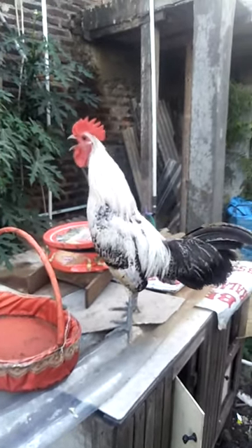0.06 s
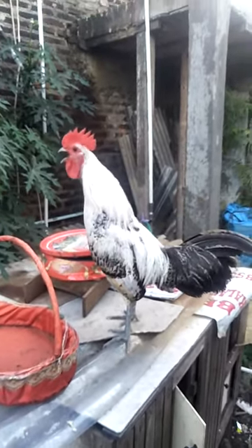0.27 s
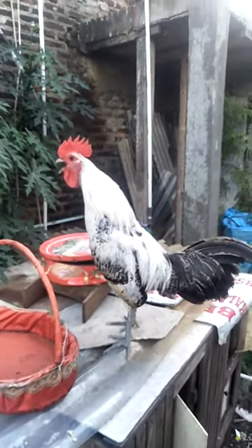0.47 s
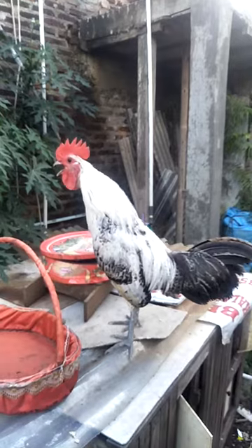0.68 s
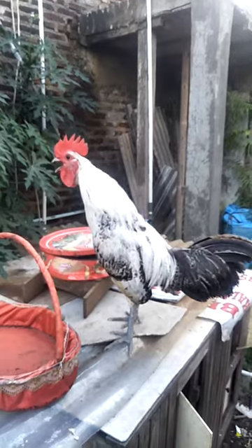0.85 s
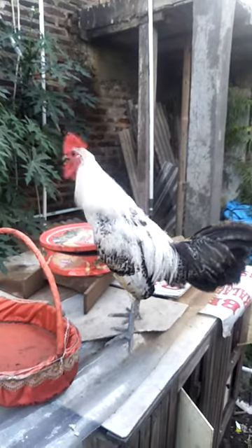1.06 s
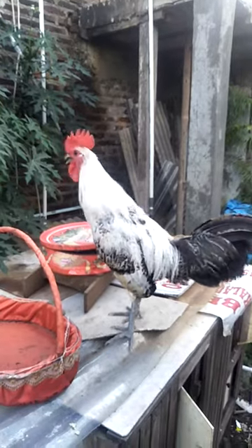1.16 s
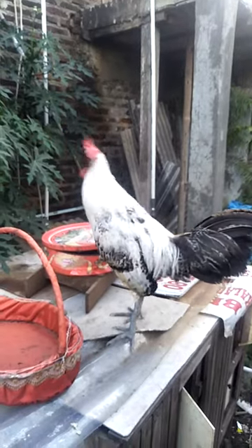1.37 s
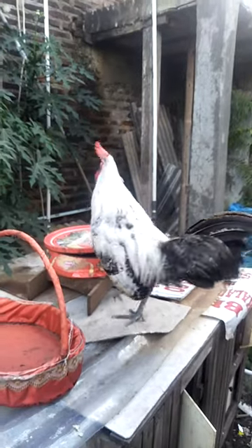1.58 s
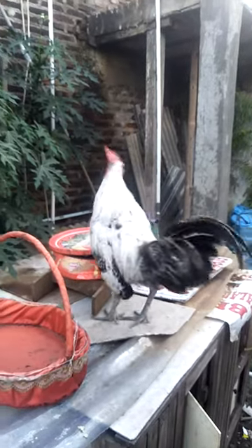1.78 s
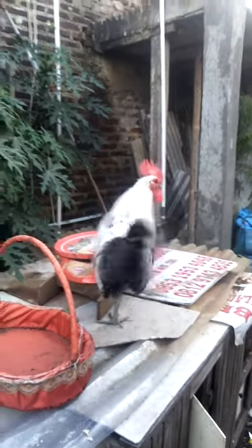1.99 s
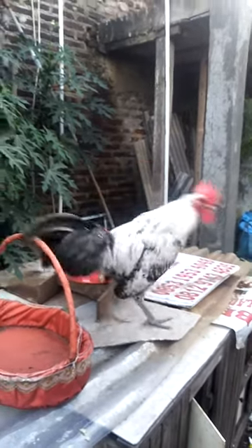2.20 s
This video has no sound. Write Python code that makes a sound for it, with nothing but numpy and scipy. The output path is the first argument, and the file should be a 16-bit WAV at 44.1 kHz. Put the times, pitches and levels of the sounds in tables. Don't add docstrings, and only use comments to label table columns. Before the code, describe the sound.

A rooster close to the microphone gives one loud crow, a hoarse shriek into a long sagging note and soft low drawl, then claws scuff and knock on boards over faint town rumble in a walled yard.

```python
import sys
import numpy as np
from scipy import signal
from scipy.fft import rfft, irfft
from scipy.io import wavfile
from scipy.ndimage import uniform_filter1d

SR = 44100
rng = np.random.default_rng(int(sys.argv[2]) if len(sys.argv) > 2 else 0)


def to_wav(s):
    ch = np.atleast_2d(s).T
    pcm = np.round(np.clip(ch, -1, 1) * 32767)
    wavfile.write(sys.argv[1], SR, pcm.astype(np.int16))


def amplitude_ratio(level_db):
    exponent = np.asarray(level_db, float) / 20
    return 10 ** exponent


N = 99225
LEAD = 13230
M = N + LEAD


def evened(x):
    return x / np.sqrt(np.mean(x ** 2) + 1e-20)


def read(points, hz):
    f, value = np.transpose(points)
    return np.interp(np.log(hz + 1), np.log(f + 1), value)


def colour(x, points):
    gain = amplitude_ratio(read(points, np.fft.rfftfreq(len(x), 1 / SR)))
    return irfft(rfft(x) * gain, len(x))


def drift(n, top_hz):
    low_pass = signal.butter(2, top_hz, fs=SR, output="sos")
    settle = 9000
    return evened(signal.sosfilt(low_pass, rng.standard_normal(n + settle))[settle:])


def fuzz(n, hz, width_hz):
    angle = 2 * np.pi * hz * np.arange(n) / SR
    return evened(drift(n, width_hz / 2) * np.cos(angle) + drift(n, width_hz / 2) * np.sin(angle))


def add(mix, s, sound):
    part = mix[LEAD + round(s * SR):][:len(sound)]
    part += sound[:len(part)]


# lock to every nth cycle, level in dB.
FOLD_SLIPS = [(5, 0), (3, -2), (2, -6)]


def fold_shake(hz):
    n, wander, breath_db = len(hz), .032, -11
    slips = 0
    for every, db in FOLD_SLIPS:
        slow = np.cumsum(hz / every * (1 + wander * drift(n, 19.8))) / SR
        swing = np.cos(2 * np.pi * slow) + .5 * np.cos(4 * np.pi * slow + 1)
        slips = slips + amplitude_ratio(db + 5.0 * drift(n, 8)) * swing
    return evened(evened(slips) + amplitude_ratio(breath_db) * drift(n, 600))


# frequency in Hz, level in dB.
THROAT = [(150, -63), (560, -37), (800, -10.5), (1010, -19), (1270, -11), (1450, -18), (1830, -6),
          (2400, -3.5),
          (3000, -29), (3680, -13.5), (4010, -46.5), (4450, -45.5), (6070, -42.5), (7910, -52.5),
               (12100, -52), (15500, -85)]


def hoarse_rasp(hz, turns):
    n, ragged_db = len(hz), 1.2
    shake = fold_shake(hz)
    orders = range(1, int(15000 / hz.max()))
    folds = sum(np.cos(2 * np.pi * (k * turns + rng.random())) for k in orders)
    rasp = colour(folds * np.tanh(1.5 * shake), THROAT)
    rasp = rasp / np.sqrt(uniform_filter1d(rasp ** 2, size=500))
    return rasp * evened(amplitude_ratio(ragged_db * drift(n, 70)))


def clear_tone(hz, turns, effort_db, beak, share, overtones):
    n, levels, beak_gains = len(hz), *overtones
    smear_db, wobble_rad = 3.5, .85
    dull_db = 0.0328
    shimmer_db, uneven_db = .9, .3
    half_db = -55
    loss_db = smear_db * share + dull_db * (effort_db.max() - effort_db)
    wobble = wobble_rad * share * drift(n, 80)
    tone = 0
    for k, (db, gain) in enumerate(zip(levels, beak_gains + [0] * len(levels)), 1):
        level_db = db + gain * beak - (k - 2.5) * loss_db
        swell_db = shimmer_db * k ** .5 * drift(n, 27) + uneven_db * k * drift(n, 6.8)
        angle = k * (2 * np.pi * turns + wobble) + 2 * np.pi * rng.random()
        tone = tone + amplitude_ratio(level_db + swell_db) * np.cos(angle)
    tone = tone / np.sqrt(uniform_filter1d(tone ** 2, size=900))
    tone = signal.sosfilt(signal.butter(4, .7 * hz.min(), "high", fs=SR, output="sos"), tone)
    half = np.cos(np.pi * turns + 1.5 * drift(n, 40))
    return tone + amplitude_ratio(half_db + 5 * drift(n, 30)) * half


def crow(note, overtones):
    s, *cols = np.transpose(note)
    t = np.arange(s[0], s[-1], 1 / SR)
    hz, effort_db, beak, hoarse_db = [uniform_filter1d(np.interp(t, s, c), size=150) for c in cols]
    n, jitter = len(t), .0007
    share = 1 / np.sqrt(1 + amplitude_ratio(-2 * hoarse_db))
    turns = np.cumsum(hz * (1 + jitter * drift(n, 60) * (1 + 8 * share))) / SR
    clear = clear_tone(hz, turns, effort_db, beak, share, overtones)
    voice = np.sqrt(1 - share ** 2) * clear + share * hoarse_rasp(hz, turns)
    return s[0], signal.windows.tukey(n, 400 / n) * amplitude_ratio(effort_db) * voice


# time in seconds, pitch in Hz, effort in dB, beak from -1 closed to 1 open, hoarseness in dB.
EARLIER_CRY = [(-.25, 1301, -17, 0, 1), (-.02, 1307, -15.5, 0, 12.5)]
LIFT = [(.08, 827, -59.5, 0.71, 0.5), (.09, 873.4, -38, -0.23, 2.5), (.11, 858, -32, -0.35, 7.5),
        (.13, 921.4, -16.5, -0.4, -8.5), (.165, 984, -17, 0.9, -13.5), (.2, 991, -15.5, 1, -10),
        (.215, 1020, -41.5, 0.68, -9)]
SHRIEK = [(.16, 1196, -35.5, 0, 13.5), (.172, 1230, -19, 0, -5), (.22, 1206, -14, 0, 9.5),
          (.29, 1255, -15, 0, -2), (.33, 1248, -15, 0, 10.5), (.405, 1219, -16.5, 0, -7),
          (.42, 1195, -10.5, 0, -12), (.435, 1214, -17.5, 0, -2), (.512, 1219, -17, 0, 4.5),
          (.52, 1216, -33.5, 0, 3.5)]
HELD_NOTE = [(.47, 827, -34, -1, -21.5), (.49, 832, -16.5, -1.3, -5), (.508, 929, -22.5, -.5, -11),
             (.518, 929.2, -13.5, 0.72, -25.5), (.628, 933.8, -13.5, 0.85, -59.5),
             (.642, 962, -20, 0.0052, -14.5), (.692, 954.4, -15, 0.23, -38.5),
             (.704, 929, -14.5, 0.28, -20), (.716, 918.4, -11, 0.73, -39.5),
             (.78, 917.6, -14, 0.92, -46.5), (0.838, 912.3, -15.5, 0.2, -63),
               (0.919, 906, -15, -.8, -29.5), (0.986, 896.6, -14.5, -0.66, -41),
               (0.999, 904, -15, -0.65, -15), (1.03, 891.7, -16, -0.59, -13.5),
               (1.047, 850.6, -11.5, -1.8, -18), (1.064, 826.8, -18, -1.4, -11.5), (1.088, 841, -33, 1, -5)]
LOW_DRAWL = [(1.124, 606, -47, -0.24, -10), (1.134, 616, -39.5, 0.4, 4), (1.16, 658, -39, 0, -20),
             (1.19, 665.6, -34, 0.36, -17), (1.21, 658.4, -38, 0.11, -48), (1.27, 676.3, -33, 0.14, -31),
             (1.385, 661.6, -35, -0.06, -49), (1.435, 682, -34, -1, -44.5),
             (1.468, 672, -31.5, -1.16, -36.5), (1.486, 650, -63, -2.5, -33)]
FADING_DRAWL = [(1.455, 667, -51, 0.86, -29), (1.478, 645.7, -36.5, 0.66, -48),
                (1.498, 637, -31.5, 0.97, -66), (1.562, 638, -36.5, 0.83, -25),
                (1.58, 620.3, -45, 0.013, -32), (1.595, 620, -41, 0.8, -26), (1.62, 614.6, -49, 1.35, -23),
                (1.69, 608, -58, 1.5, -7.5), (1.715, 594, -68, 0, -1)]
LOUD_VOICE = [-0.5, -1, -12.5, -19, -55.5, -38, -33.5, -44.5, -50, -53.5, -52.5, -51.5, -48.5, -54, -57,
              -61, -70], [-3, 11, -1.5, -0.5, -6.5, -2.5, -2]
SHRILL_VOICE = [-10, 0, -22.5, -40, -29.5], [0]
SOFT_VOICE = [3.5, -1.5, -6, -10.0, -7, -28, -38.5, -39.5, -35.5, -41, -35.5] + 9 * [-46], [-14.0, -2, -1.5,
              1, 29, -6.5, 42.5] + 13 * [12]
FAINT_VOICE = [-11.5, -5, -8, -26.5, -6.5, -27.5, -50], [-1.5, 13.7]


def rooster():
    out = np.zeros(M)
    for note, overtones in [(EARLIER_CRY, SHRILL_VOICE), (LIFT, LOUD_VOICE), (SHRIEK, SHRILL_VOICE),
                            (HELD_NOTE, LOUD_VOICE), (LOW_DRAWL, SOFT_VOICE),
                            (FADING_DRAWL, FAINT_VOICE)]:
        add(out, *crow(note, overtones))
    return out


# start in seconds, length in seconds, level in dB, first pitch in Hz, last pitch in Hz.
STRANDS = [(0.16, 0.062, -20.5, 1328, 1366), (.215, 0.055, -17, 1860, 1960), (0.26, .05, -21, 2300, 2500),
           (.24, .095, -21, 2190, 2270), (.2, .11, -17.5, 2410, 2540), (0.28, 0.094, -26, 787, 860),
           (0.42, .035, -22.5, 2400, 2440), (.38, 0.019, -24.5, 900, 830), (0.49, .03, -22.5, 2264, 2247),
           (0.45, 0.043, -15, 2270, 2400), (1.025, 0.012, -11, 1940, 1830), (1.062, .011, -18, 2200, 1700),
           (1.064, .011, -23.5, 1750, 1550), (1.038, .024, -40, 4330, 4200), (.17, 0.1, -26.5, 990, 870),
           (.45, 0.027, -26, 820, 820), (.43, .06, -23, 1980, 1600), (0.26, 0.06, -23, 2300, 2300),
           (.36, .05, -24, 2010, 2200), (.47, .03, -21, 2000, 2100), (0.29, .07, -20.5, 2510, 2440),
           (.995, .035, -26.5, 2010, 1700), (1.4, 0.033, -61, 3600, 3400), (1.416, 0.02, -42, 2680, 2760)]


def torn_strands():
    out = np.zeros(M)
    for s, length, db, from_hz, to_hz in STRANDS:
        t = np.arange(0, length, 1 / SR)
        n = len(t)
        turns = np.cumsum(from_hz + (to_hz - from_hz) * t / length) / SR
        swell = amplitude_ratio(db + 2.5 * drift(n, 50)) * np.sin(np.pi * t / length) ** .6
        add(out, s, swell * np.sin(2 * np.pi * turns + .35 * drift(n, 60)))
    return out


def grainy_burst(length, db, hz, rise_s):
    t = np.arange(0, 2 * length, 1 / SR)
    band = signal.butter(3, [hz / 1.4, 1.4 * hz], "band", fs=SR, output="sos")
    grain = evened(signal.sosfilt(band, rng.standard_normal(len(t)))) * amplitude_ratio(2.2 * drift(len(t), 250))
    return amplitude_ratio(db - 14 * t / length) * np.minimum(t / rise_s, 1) * grain


# start in seconds, length in seconds, level in dB, centre in Hz.
GASPS = [
    (.99, .06, -45.5, 3400),
    (1.025, 0.063, -44.5, 4100),
    (1.062, 0.028, -39, 3900),
    (.165, 0.14, -38.5, 740),
    (0.14, .06, -52.5, 6500),
    (.105, .09, -60, 9300),
    (.085, 0.06, -48, 3100),
]


def gasps():
    out = np.zeros(M)
    for s, length, db, hz in GASPS:
        add(out, s, grainy_burst(length, db, hz, rise_s=.4 * length))
    return out


# start in seconds, length in seconds,
# level in dB, centre in Hz.
SCUFFS = [(1.004, 0.046, -42.5, 274.7), (1.576, 0.0123, -57, 3500), (1.595, 0.09, -54.5, 845),
          (1.614, 0.088, -71, 5600), (1.59, .07, -69.5, 3900), (1.626, 0.076, -60.5, 2200),
          (1.733, 0.11, -52, 720), (1.735, 0.1, -56.5, 2410), (1.789, 0.016, -47.5, 797),
          (1.789, 0.047, -54, 2095), (1.803, 0.01, -64.5, 5040), (2.162, 0.022, -52.5, 4230),
          (2.163, 0.016, -61, 7600), (2.164, 0.027, -54, 1700), (2.169, 0.029, -42.5, 633),
          (2.171, 0.029, -47, 1200), (2.172, 0.069, -61.5, 2800), (2.195, 0.13, -65, 1200),
          (2.196, 0.043, -50, 297)]


def claws():
    out = np.zeros(M)
    for s, length, db, hz in SCUFFS:
        add(out, s, grainy_burst(length, db, hz, rise_s=.0025))
    knock_s, knock_db, knock_ms = 2.2259, -27.5, .11
    u = np.arange(400) / SR / (knock_ms / 1000)
    add(out, knock_s, amplitude_ratio(knock_db) * u ** 3 * (1 - .25 * u) * np.exp(-u))
    return out


# frequency in Hz, time to fall by 60 dB in seconds.
YARD_RING = [(500, 0.63), (900, 0.29), (1200, 0.51), (2500, 0.23), (4200, 0.35), (8000, 0.12)]


def yard(x):
    taps = np.zeros(SR)
    at = np.arange(400, SR - 20, 20)
    taps[at + rng.integers(0, 20, len(at))] = rng.choice([-1., 1.], len(at))
    hz, t, z = signal.stft(taps, SR, nperseg=256)
    fading = amplitude_ratio(-60 * t / read(YARD_RING, hz)[:, None])
    tail = signal.istft(z * fading, SR, nperseg=256)[1]
    return signal.fftconvolve(x, tail / np.linalg.norm(tail))[:M]


# frequency in Hz, level in dB per Hz.
TOWN_COLOUR = [(20, -26.5), (60, 0), (180, 0), (290, -16), (500, -35), (900, -46), (4500, -44),
               (15000, -51)]
# pitch in Hz, width in Hz, level in dB.
HUM = [(177.7, 27, -61)]


def town():
    town_db = -52.5
    out = amplitude_ratio(town_db + 1.6 * drift(M, 23)) * evened(colour(rng.standard_normal(M), TOWN_COLOUR))
    out += sum(amplitude_ratio(db) * fuzz(M, hz, width_hz) for hz, width_hz, db in HUM)
    return out


def insect():
    return amplitude_ratio(-84 + 3.0 * drift(M, 20)) * fuzz(M, 10400, 500)


# start in seconds, length in seconds, level in dB, pitch in Hz.
CHEEPS = [
    (1.6, 0.047, -50.5, 836),
    (1.616, 0.13, -48, 534),
    (1.727, 0.037, -55.5, 3320),
    (1.79, 0.026, -50, 2700),
    (1.842, 0.032, -66, 1660),
    (1.964, 0.026, -76, 4600),
    (2.113, 0.016, -73, 2320),
]


def small_birds():
    out = np.zeros(M)
    for s, length, db, hz in CHEEPS:
        t = np.arange(0, length, 1 / SR)
        n = len(t)
        swell = amplitude_ratio(db) * np.sin(np.pi * t / length) * amplitude_ratio(1.5 * drift(n, 40))
        add(out, s, swell * np.sin(2 * np.pi * hz * t + .6 * drift(n, 40)))
    return out


def ducking(near):
    from_db, share, recover_db_per_s = -25, .3, 38.5
    power_db = 10 * np.log10(abs(uniform_filter1d(near ** 2, size=2000)) + 1e-12)
    fall = np.arange(M) * recover_db_per_s / SR
    held_db = np.maximum.accumulate(power_db + fall) - fall
    return 1 / amplitude_ratio(share * np.maximum(held_db - from_db, 0))


def scene():
    near = rooster() + torn_strands() + gasps() + claws()
    yard_db = -18.5
    background = town() + insect() + small_birds()
    mix = near + amplitude_ratio(yard_db) * yard(near) + background * ducking(near)
    return mix[None, LEAD:]


def roll_off(x):
    return signal.sosfilt(signal.butter(12, 15650, fs=SR, output="sos"), x)


def record(dry):
    return roll_off(dry)


dry = scene()
out = record(dry)
to_wav(out)
```